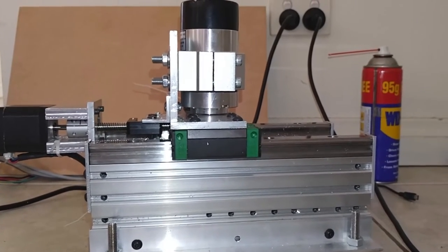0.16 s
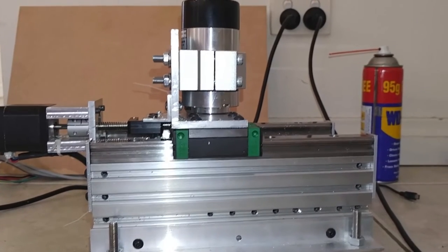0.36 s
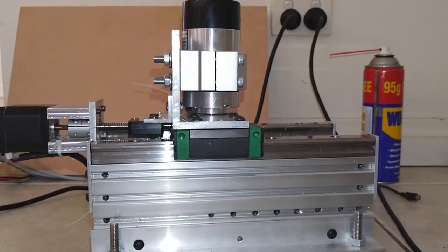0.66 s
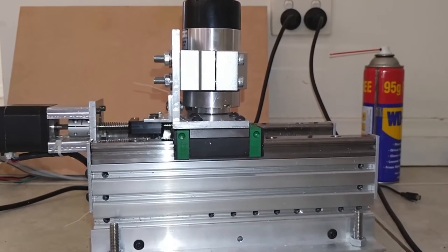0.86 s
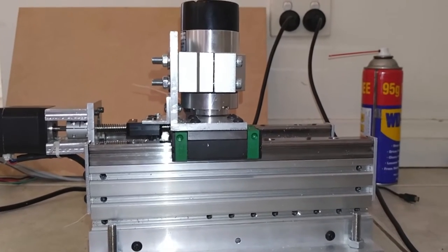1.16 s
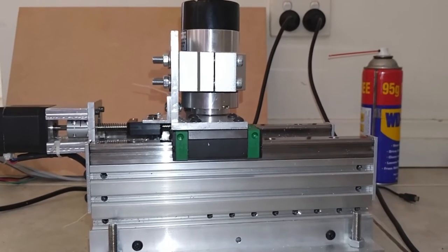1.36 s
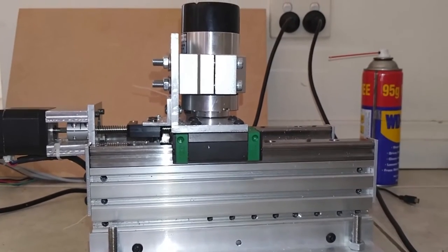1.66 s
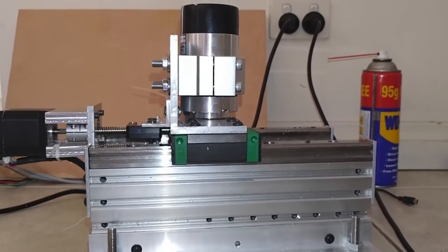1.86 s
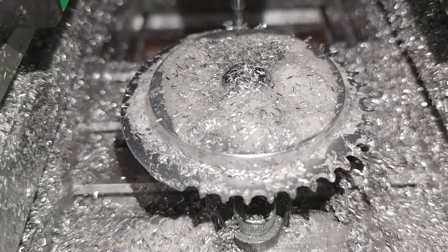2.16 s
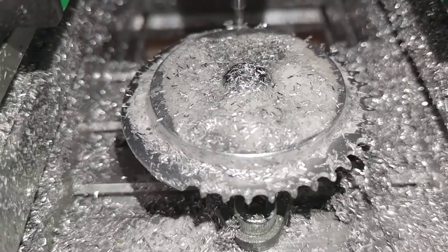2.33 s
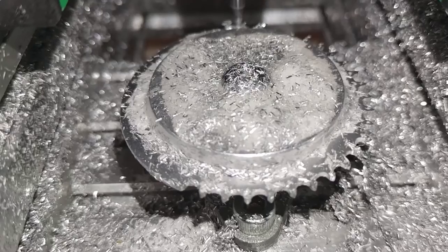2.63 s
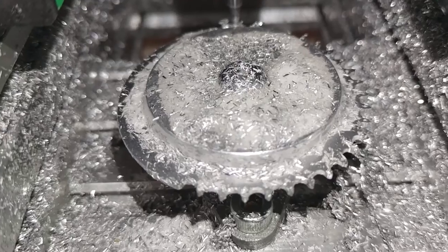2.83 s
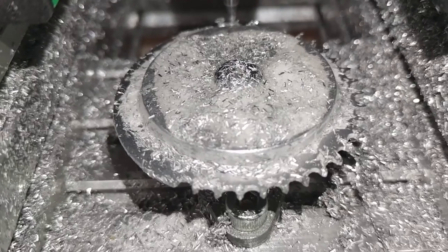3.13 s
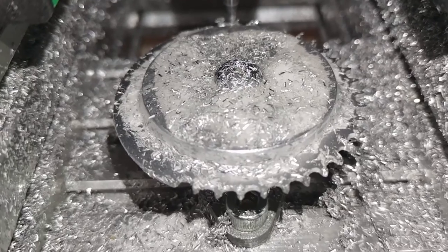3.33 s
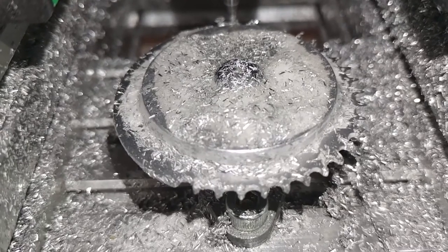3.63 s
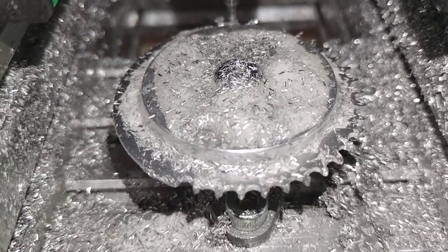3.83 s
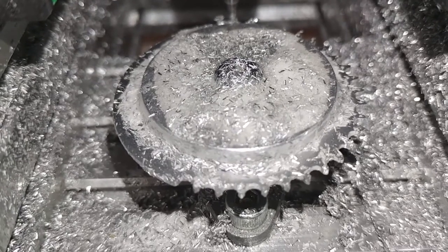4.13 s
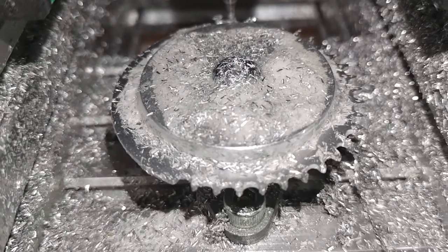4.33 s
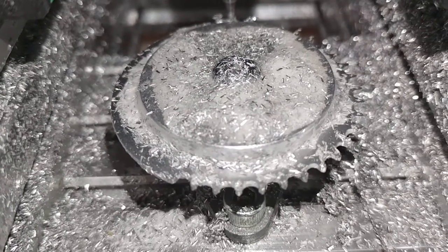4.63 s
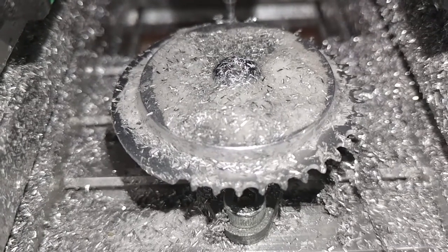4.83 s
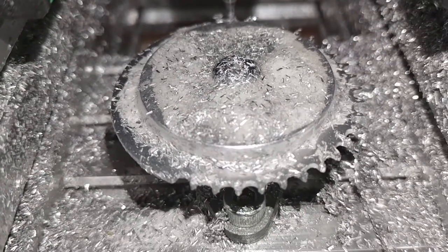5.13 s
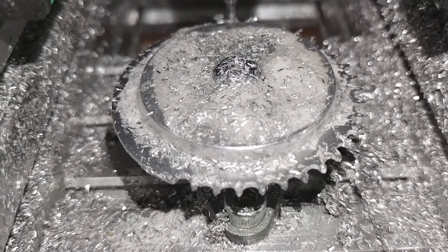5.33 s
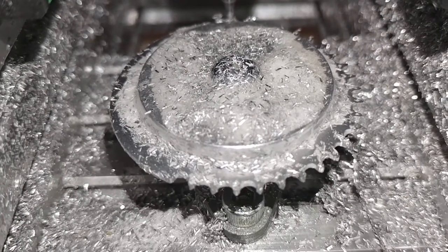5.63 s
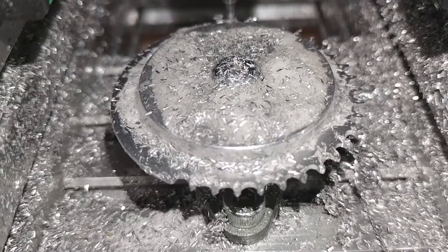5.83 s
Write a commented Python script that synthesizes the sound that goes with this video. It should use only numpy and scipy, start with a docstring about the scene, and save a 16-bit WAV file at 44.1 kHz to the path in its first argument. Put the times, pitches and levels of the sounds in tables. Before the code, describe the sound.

A small electric milling spindle drones across a bench in a room, a mid-pitched roar with hum, thin high whine and faint squeaks about four times a second. Near two seconds it cuts to silence, then fades in fast from close over the metal work, louder and brighter, surging before it settles. A dull bump hits the microphone just after the return.

```python
"""A small milling spindle, heard first from across the bench: filtered noise for housing roar and air hiss, wavering
sines for motor and inverter, and rubbing squeaks (ringing noise) about four times a second. A noise band swells early.
At about 2.1 s the sound cuts to silence, then fades in from close over the work and surges before it settles.
Just after the fade, as the level surges, a higher noise band swells and the microphone takes one bump, a push and
a slowing swing; the squeaks go on, and a last noise band swells near 5.5 s."""
import sys
import numpy as np
from scipy import signal
from scipy.io import wavfile
from scipy.ndimage import uniform_filter1d

SR = 44100
rng = np.random.default_rng(int(sys.argv[2]) if len(sys.argv) > 2 else 0)


def wav_record(signal):
    """Record a signal, one row per channel, as 16-bit PCM in the file named by sys.argv[1]."""
    frames = np.transpose(np.atleast_2d(signal))
    bounded = np.clip(frames, -1, 1)
    # unit amplitude maps onto the largest positive 16-bit level
    quanta = np.round(bounded * 32767).astype(np.int16)
    wavfile.write(sys.argv[1], SR, quanta)


N = 264159

# Levels in the tables are at the microphone, before the cut, fade and surge; "lead" is how far left leads right.

# roar of the housing from each place, before the frame resonances:
# (frequency [Hz], left [dB per Hz], right [dB per Hz], left-right likeness [0-1], lead [rad])
FAR_ROAR = [(40, -82, -85, 0.7, 0), (108, -79, -80, 0.53, 0.2), (221, -69.5, -70, 0.85, -0.6),
            (352, -71, -72, 0.47, 0.5), (400, -66, -68, 0.69, -0.7), (684, -61.0, -60.5, 0.82, 0.06),
            (879, -56.5, -58, 0.49, -0.1), (947, -61.0, -58, 0.1, 0.5), (1150, -59, -61.5, 0.94, 0.6),
            (1310, -64, -64, 0.3, -1.5), (1448, -67, -63.5, 0.4, 1.2), (1654, -52.5, -55.5, 0.86, 1.15),
            (1718, -53, -54, 0.99, 0.57), (1895, -65.5, -62.5, 0.52, 0.8), (2127, -65.5, -67, 0.45, 3.5)]
NEAR_ROAR = [(40, -91, -99, 0.6, -5), (105, -76, -76.5, 0.54, 0), (298, -66, -63.5, 0.83, -0.2),
             (407, -65.5, -66, 0.81, 0.3), (457, -58.5, -59, 0.7, 0.34), (494, -61, -61.5, 0.98, 0.4),
             (704, -55, -56.5, 0.34, 1.5), (860, -44.5, -53.5, 0.76, 1.8), (954, -47.5, -47.5, 0.99, 0.18),
             (1108, -50.5, -54.5, 0.83, 0.63), (1215, -56.5, -54.5, 0.74, 0.44),
             (1263, -59.5, -60, 0.52, 1), (1434, -56, -61, 0.84, 1.3), (1560, -51.5, -52.5, 0.72, 1.84),
             (1784, -56.0, -61, 0.86, 2.5), (1930, -63, -64, 0.32, -3.0), (2133, -64.5, -61.5, 0.87, 0.6)]
# hiss of cooling air and bearings from each place, before the frame resonances:
# (frequency [Hz], left [dB per Hz], right [dB per Hz], left-right likeness [0-1], lead [rad])
FAR_HISS = [(2143, -67.5, -67.5, 0.36, 0.8), (2730, -69, -69, 0.23, -3.0), (3020, -63.5, -66, 0.44, 2),
            (4840, -73, -75, 0.06, -3.5), (5050, -74, -76, 0.12, 1), (5421, -73.5, -74.5, 0.18, 0.3),
            (7214, -78, -81, 0.05, -2), (7639, -78.5, -75.0, 0.03, -0.7), (9820, -79.0, -82, 0.08, 2),
            (10309, -86.5, -87.5, 0.23, 2), (10720, -79.5, -81.5, 0.09, 0.1),
            (11725, -82.0, -84, 0.08, 1.5), (14734, -81.5, -81.5, 0.06, 3), (15595, -85.5, -84.5, 0.47, 1)]
NEAR_HISS = [(2125, -65.5, -62, 0.29, 2), (2476, -69.5, -70.5, 0.43, -2), (2830, -64, -68.5, 0.54, -3.5),
             (3246, -69, -68.5, 0.36, -1.2), (3470, -64.0, -65.5, 0.27, -2), (3849, -73, -73.5, 0.11, -3.5),
             (4480, -72, -69.5, 0.26, -2), (4870, -75.5, -78.5, 0.11, -0.8),
             (5992, -75.5, -75.0, 0.04, 1.0), (9195, -79, -76.5, 0.16, -0.2),
             (9878, -75.5, -81.0, 0.26, 0.2), (10309, -83.0, -87.0, 0.43, 0.1),
             (10917, -81.5, -83, 0.17, -1), (15595, -81.5, -80.5, 0.53, -1)]
# narrow frame resonances excited by roar and hiss:
# (frequency [Hz], width [Hz], far boost [dB], near boost [dB])
FRAME_RESONANCES = [(501, 24, 4, 4.5), (569, 20, 6.5, -0.5), (676, 40, 7.5, 4.5), (815, 15, 10.5, 2),
                    (884, 17, 8, 5), (937, 20, -6, 5), (1648, 40, 4, -0.5), (1741, 27, 4, 0.5),
                    (3530, 100, 3, 0), (6420, 190, 5, 0.5)]

# pitches of the shaft tones: (multiple of the shaft speed [1])
SHAFT_MULTIPLES = [1, 2, *range(4, 13, 4), *range(16, 41, 4), 48]
# shaft tones, a row for each multiple:
# (far left [dB], far right [dB], far lead [rad], near left [dB], near right [dB], near lead [rad])
SHAFT_TONES = [(-42, -42, 0.2, -35, -37, 0.6), (-48, -48, -0.2, -44, -57, 0.2),
               (-47, -39, -0.4, -51, -44, 0.6), (-35, -40, 3.1, -36, -42, 0.3),
               (-60, -54, -0.6, -55, -57, 3.0), (-38, -39, 2.0, -39, -50, -1.0),
               (-52, -57, 0.6, -63, -65, 0.9), (-50, -61, -1.5, -57, -62, 1.4),
               (-70, -61, 1.0, -63, -59, -1.6), (-64, -65, 2.8, -62, -63, 0.2),
               (-68, -66, -1.6, -64, -62, -1.5), (-65, -67, 0.6, -63, -65, 0.2),
               (-65, -67, 0.4, -62, -67, 0.3)]
# tones around the inverter pitch, a row for each offset:
# (far left [dB], far right [dB], far lead [rad], near left [dB], near right [dB], near lead [rad])
INVERTER_SIDEBANDS = [(-46, -53, 2.3, -48, -48, 1.2), (-55, -50, 0.5, -63, -50, -0.4),
                      (-56, -62, -0.0, -58, -62, -2.4), (-70, -61, 1.8, -54, -55, -0.2),
                      (-66, -62, -1.6, -62, -66, -0.6), (-68, -70, -1.9, -55, -62, 0.2),
                      (-63, -70, -2.3, -61, -62, -0.1), (-70, -70, -3.1, -62, -62, 2.3),
                      (-63, -61, -0.9, -55, -53, -2.9), (-58, -59, -2.5, -64, -54, -0.6),
                      (-65, -64, -0.6, -53, -53, 0.3), (-64, -58, -1.7, -51, -58, -1.8)]
# slightly fuzzy tones not tied to the shaft: (frequency [Hz],
# far left [dB], far right [dB], far lead [rad], near left [dB], near right [dB], near lead [rad])
LOOSE_TONES = [(682, -43, -44, 0.2, -39, -42, 0.7), (1364, -38, -41, 0.8, -36, -39, -0.0),
               (2377, -50, -54, 1.4, -52, -56, 0.7), (2584, -58, -59, 2.8, -50, -54, -1.2),
               (3768, -54, -58, 1.2, -53, -52, 0.1), (4323, -56, -64, -2.7, -59, -54, 1.5),
               (8258, -67, -58, -2.4, -60, -56, -2.1), (8398, -59, -56, 1.2, -55, -51, 2.7),
               (9351, -66, -70, -0.5, -61, -58, -0.2), (11009, -68, -69, 0.6, -60, -62, 0.8)]

# rubbing squeaks, before the gains of ring and scrape: (time [s], level [dB])
SQUEAKS = [(.151, -51), (.423, -43), (.684, -50), (.968, -46), (1.239, -54), (1.547, -46), (1.832, -50),
           (2.4, -46), (2.623, -43), (2.927, -46), (3.191, -44.5), (3.465, -51), (3.739, -43.5),
           (4.067, -49), (4.311, -44.5), (4.564, -47), (4.847, -45.5), (5.117, -45), (5.427, -48),
           (5.68, -44), (5.929, -50)]
# pitches that the rubbing part rings at: (frequency [Hz])
SQUEAK_HZ = [8780, 9100, 9822, 10022, 12500, 14980]
# ring at each of those pitches, relative to the squeak: (width [Hz], far level [dB], near level [dB])
SQUEAK_MODES = [(70, -1, -9), (800, -7, -8), (50, -15, -4), (45, -10.5, -5.5), (100, -17, -8.5),
                (150, -14, -8)]
# bands of noise that swell for a while:
# (middle [s], half length [s], frequency [Hz], width [Hz], level [dB])
NOISE_SWELLS = [(.575, .045, 820, 200, -32), (2.5, .3, 11500, 6000, -47), (5.5, .2, 7450, 900, -43.5)]
# the bump on the microphone: (time [s], level [dB])
BUMP = (2.5038, -11.5)

SHAFT_HZ, INVERTER_HZ = 254.4, 14551.5
INVERTER_OFFSETS = range(-40, 5, 4)  # shaft multiples off the inverter tone
FAR_PLACE, NEAR_PLACE = range(2)  # across the bench, close over the work
MOVE_S = 2.2  # the listening place changes here, in the silence
CUT_S, CUT_DROP_DB, FALL_DB_PER_S = 2.0785, -16, -950  # drops at once, then falls to silence in a fraction of a second
FADE_START_S, FADE_S, FADE_POWER = 2.2697, 0.11, 4.2  # returns along a steep curve
SURGE_DB, SURGE_RISE_S, SURGE_SETTLE_S = 4, 0.057, 1.08  # overshoots after the fade, then settles
EDGE_HZ = 15730  # top of the recorded band

T = np.arange(N) / SR
NEAR = T > MOVE_S


def gain_of(db):
    """Decibels to amplitude."""
    return 10 ** (np.asarray(db) / 20)


def evened(x):
    """Scales to rms 1."""
    return x / np.sqrt(np.mean(x ** 2) + 1e-20)


def drift(seconds, count=1):
    """Slow random curves of rms about 1 that change over about the given time."""
    knots = rng.standard_normal((count, N // 64 + 2))  # one knot per 64 samples
    size = max(round(seconds * SR / 64), 1)
    smooth = uniform_filter1d(knots, size, mode="wrap")
    smooth = uniform_filter1d(smooth, size, mode="wrap")
    return np.array([np.interp(np.arange(N) / 64, np.arange(len(k)), evened(k)) for k in smooth])


def resonate(x, hz, width):
    """A resonance of gain 1: shift to zero frequency, smooth, shift back."""
    turn = np.exp(2j * np.pi * hz * T)
    r = np.exp(-np.pi * width / SR)
    smooth = signal.lfilter([1 - r], [1, -r], x / turn)
    return 2 * (turn * smooth).real


def frame_boost(place):
    """Gain in dB of the frame resonances, over frequency, as heard from one place."""
    def boost_db(hz):
        return sum(row[2 + place] / (1 + (2 * (hz - row[0]) / row[1]) ** 2) for row in FRAME_RESONANCES)
    return boost_db


def stereo_noise(rows, inside, boost_db, ripple_db, patchy_db, size=2048):
    """Random short-time spectra for left and right, with fixed room ripple and drifting patches."""
    hz = np.fft.rfftfreq(size, 1 / SR)
    knots, left_db, right_db, same, lead = np.transpose(rows)
    columns = left_db, right_db, np.clip(same, 0, 1) * np.exp(-1j * lead)
    left_db, right_db, same = (np.interp(np.log(hz + 1), np.log(knots), c) for c in columns)

    a, b, c, d, patches = rng.standard_normal((N * 4 // size + 5, len(hz), 5)).T
    patches = evened(uniform_filter1d(uniform_filter1d(patches, 14, 0), 4, 1))
    ripple = evened(uniform_filter1d(rng.standard_normal((2, len(hz))), 3))

    # the right channel is part left, part its own noise
    same, left = same[:, None], a + 1j * b
    right = same * left + np.sqrt(abs(1 - abs(same) ** 2)) * (c + 1j * d)
    low_patchy_db = 6.5 / (1 + (hz[:, None] / 90) ** 4)  # below about 90 Hz the level varies more, at random
    plain = gain_of([left_db, right_db] + boost_db(hz)) * inside(hz)
    fixed_gain = (plain * gain_of(ripple_db * ripple))[:, :, None]
    spectra = np.array([left, right]) * fixed_gain * gain_of((patchy_db + low_patchy_db) * patches)

    sound = signal.istft(spectra, nperseg=size, noverlap=size * 3 // 4)[1][:, :N]
    rms = np.sqrt(np.mean(np.sum(plain ** 2, axis=1)) * hz[1])  # total over the bands, hz[1] wide
    return evened(sound) * rms


def roar(rows, place, ripple_db):
    """Broad rumble of housing and frame, shaped by the frame resonances and thinned below 30 Hz."""
    def inside(hz):
        return (hz < rows[-1][0]) * hz ** 2 / (hz ** 2 + 30 ** 2)
    return stereo_noise(rows, inside, frame_boost(place), ripple_db, patchy_db=0.7, size=4096)


def hiss(rows, place, ripple_db):
    """Air and bearing noise, throbbing a little once per turn of the shaft."""
    def inside(hz):
        return hz >= rows[0][0]
    air = stereo_noise(rows, inside, frame_boost(place), ripple_db, patchy_db=1.03)
    return air * (1 + 0.057 * np.cos(2 * np.pi * SHAFT_HZ * T))


def tones(angles, rows, waver_db, fuzz, waver_s=.05):
    """Steady sines that waver in level; fuzz is a random wander of phase in radians."""
    out = np.zeros((2, N))
    wavers, wanders = drift(waver_s, count=len(rows)), drift(.04, count=len(rows))
    for steady, heard, waver, wander in zip(angles, rows, wavers, wanders):
        far, near = np.c_[list(heard[-6:-3])], np.c_[list(heard[-3:])]
        left_db, right_db, lead = np.where(NEAR, near, far)
        angle = steady + fuzz * wander + 2 * np.pi * rng.random()
        level = evened(gain_of(waver_db * waver)) * gain_of([left_db, right_db])
        out += np.sqrt(2) * level * np.cos([angle, angle - lead])  # sqrt(2): levels are rms
    return out


def motor():
    """Shaft orders and inverter sidebands share one slightly unsteady speed; loose tones stand apart."""
    shaft = 2 * np.pi * np.cumsum(SHAFT_HZ + 0.0615 * drift(0.27)[0]) / SR
    inverter = 2 * np.pi * INVERTER_HZ * T
    orders = [k * shaft for k in SHAFT_MULTIPLES]
    sidebands = [inverter + k * shaft for k in INVERTER_OFFSETS]
    loose = [2 * np.pi * row[0] * T for row in LOOSE_TONES]
    return (tones(orders, SHAFT_TONES, waver_db=0.9, fuzz=0.11)
            + tones(sidebands, INVERTER_SIDEBANDS, waver_db=1.7, fuzz=.35, waver_s=.09)
            + tones(loose, LOOSE_TONES, waver_db=1.5, fuzz=0.73))


def squeaks():
    """Short swells of friction noise that ring the modes of a small metal part."""
    strokes = sum(gain_of(db) * np.exp(-.5 * ((T - s) / 0.034) ** 2) for s, db in SQUEAKS)
    shared, left, right = rng.standard_normal((3, N))
    rub = np.array([left, right]) + 1.3 * shared
    rings = np.zeros((2, N))
    for hz, (width, far_db, near_db) in zip(SQUEAK_HZ, SQUEAK_MODES):
        ring = evened(resonate(resonate(rub, hz, width), hz, width))
        rings += gain_of(np.where(NEAR, near_db, far_db)) * ring
    scrape = evened(resonate(rub, 8700, 6000)) * gain_of(np.where(NEAR, 2.5, -3.5))
    return strokes * (rings + scrape)


def noise_swell(s, length, hz, width, db):
    """A band of noise, made by two equal resonances, that rises and falls once."""
    noise = rng.standard_normal((2, N))
    band = evened(resonate(resonate(noise, hz, width), hz, width))
    return gain_of(db) * band * np.exp(-.5 * ((T - s) / length) ** 4)


def level():
    """Gain over time: cut, silence, fade in, and a surge that settles slowly."""
    cut = gain_of(np.where(T > CUT_S, CUT_DROP_DB + FALL_DB_PER_S * (T - CUT_S), 0))
    fade = np.clip((T - FADE_START_S) / FADE_S, 0, 1) ** FADE_POWER
    since = np.maximum(T - FADE_START_S - FADE_S, 0)
    surge_db = SURGE_DB * (1 - np.exp(-since / SURGE_RISE_S)) * np.exp(-(since / SURGE_SETTLE_S) ** 2)
    return np.where(NEAR, fade * gain_of(surge_db), cut)


def bump():
    """A knock on the microphone, alike in both channels: a sharp push, then a swing that slows as it dies."""
    s, level_db = BUMP
    u = np.maximum(T - s, 0)
    turns = (u / .0117) ** .6  # a power below 1 slows the swing
    dying = np.exp(-u / .018 - (u / .024) ** 6) * (1 - np.exp(-u / .002))
    push = .7 * np.exp(-.5 * ((T - s - .0018) / .0005) ** 2)
    return gain_of(level_db) * (np.sin(2 * np.pi * turns) * dying + push)


def scene():
    """Both listening places, joined in the silence; the bump bypasses the cut and fade."""
    far = roar(FAR_ROAR, FAR_PLACE, ripple_db=2.2) + hiss(FAR_HISS, FAR_PLACE, ripple_db=2.2)
    near = roar(NEAR_ROAR, NEAR_PLACE, ripple_db=1.2) + hiss(NEAR_HISS, NEAR_PLACE, ripple_db=1.8)
    machine = np.where(NEAR, near, far) + motor() + squeaks()
    machine = machine + sum(noise_swell(*row) for row in NOISE_SWELLS)
    return machine * level() + bump()


def record(dry):
    """The microphone loses the deepest bass, below about 12 Hz; then a steep filter limits the band."""
    thinned = signal.lfilter(*signal.butter(1, 12, "high", fs=SR), dry)
    band_limit = signal.firwin(2047, EDGE_HZ, window=("kaiser", 9), fs=SR)
    return signal.oaconvolve(thinned, band_limit[None], "same")


dry = scene()
out = record(dry)
wav_record(out)
```